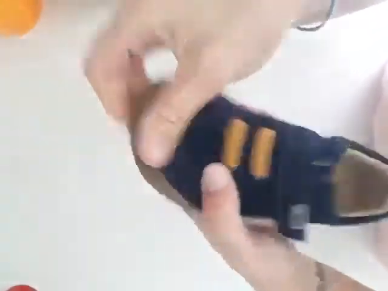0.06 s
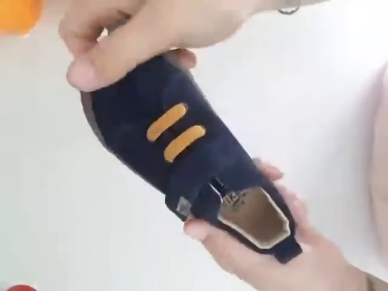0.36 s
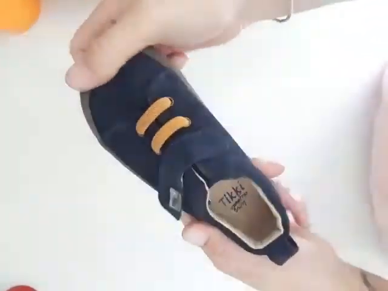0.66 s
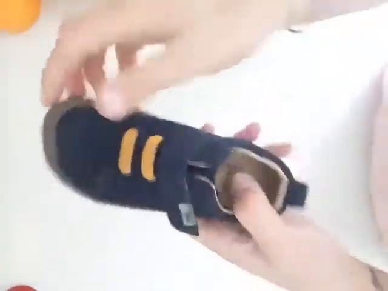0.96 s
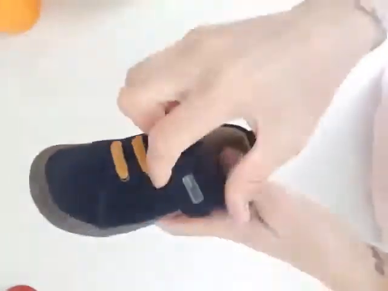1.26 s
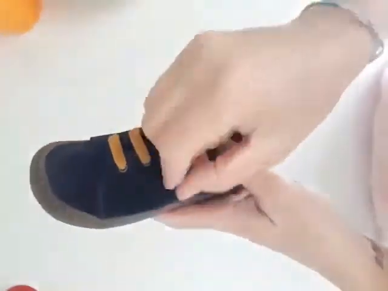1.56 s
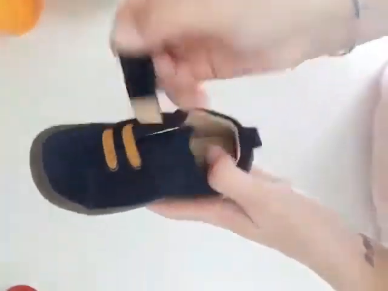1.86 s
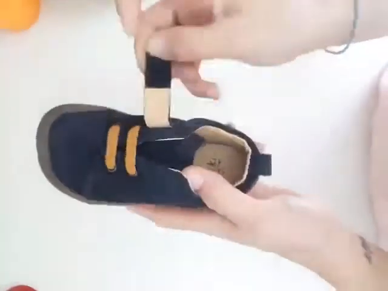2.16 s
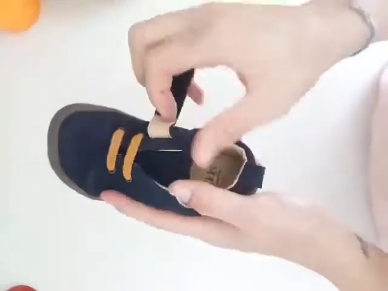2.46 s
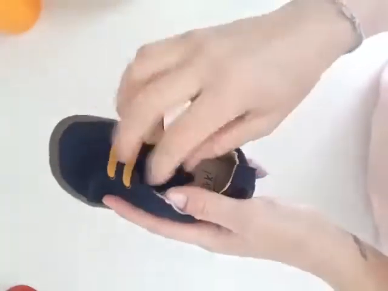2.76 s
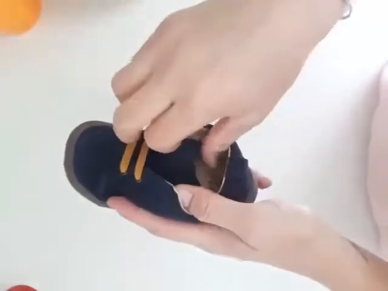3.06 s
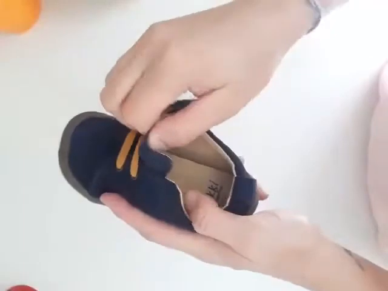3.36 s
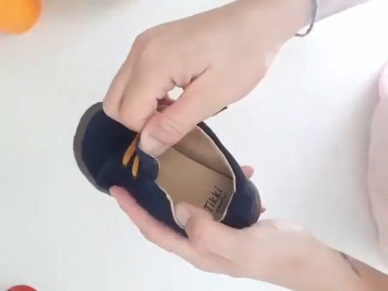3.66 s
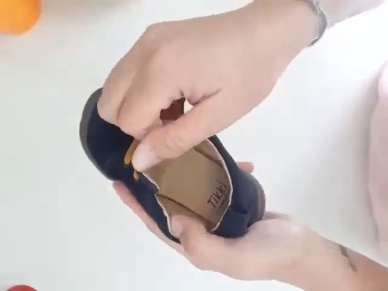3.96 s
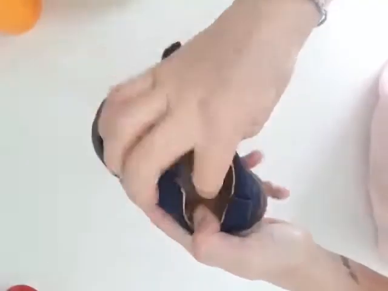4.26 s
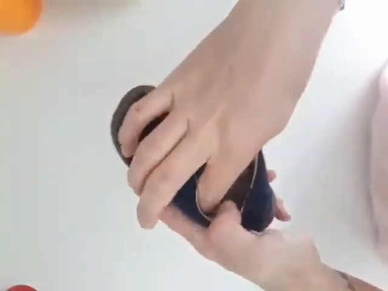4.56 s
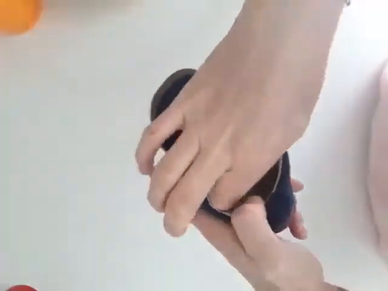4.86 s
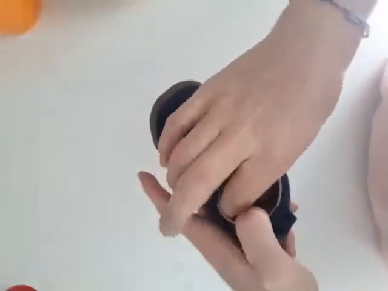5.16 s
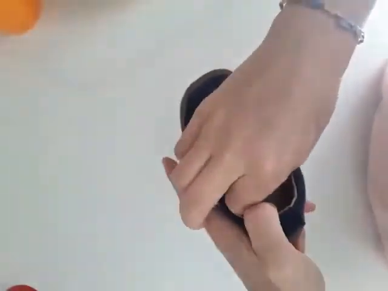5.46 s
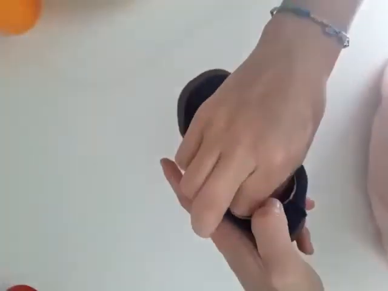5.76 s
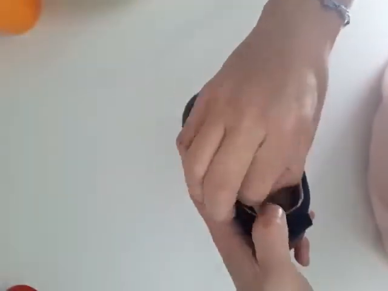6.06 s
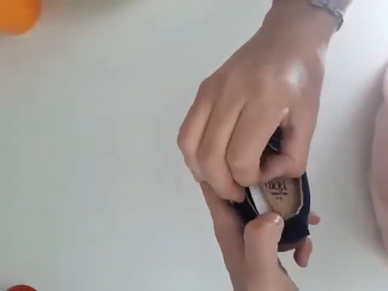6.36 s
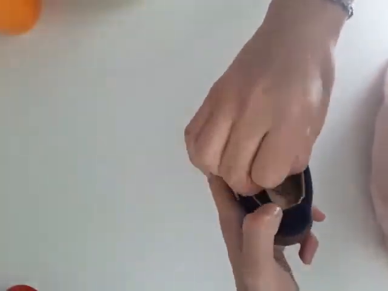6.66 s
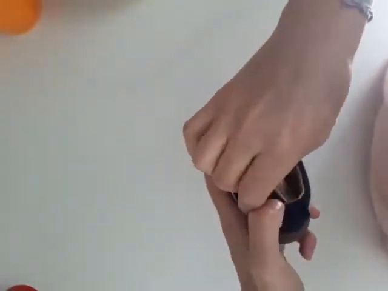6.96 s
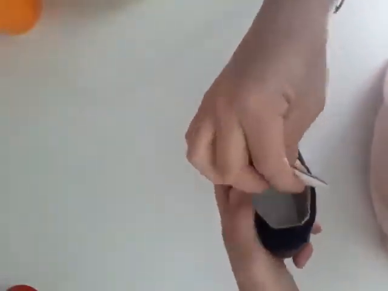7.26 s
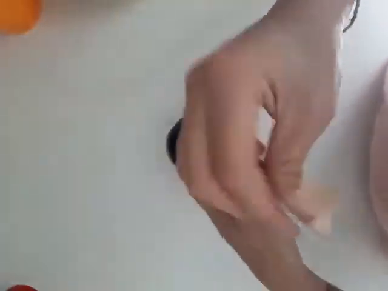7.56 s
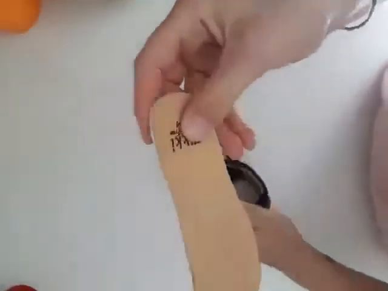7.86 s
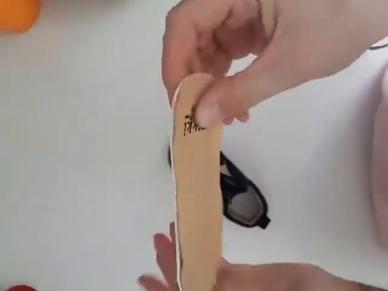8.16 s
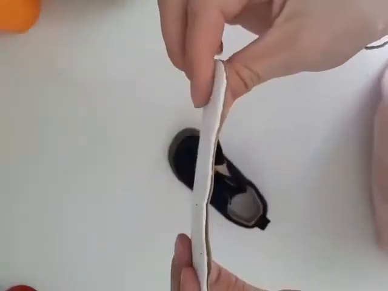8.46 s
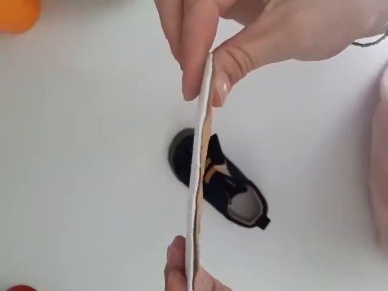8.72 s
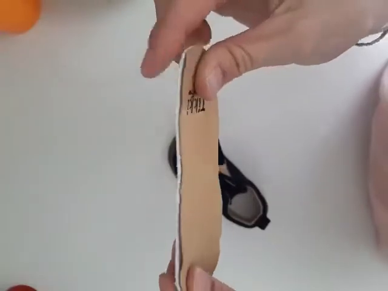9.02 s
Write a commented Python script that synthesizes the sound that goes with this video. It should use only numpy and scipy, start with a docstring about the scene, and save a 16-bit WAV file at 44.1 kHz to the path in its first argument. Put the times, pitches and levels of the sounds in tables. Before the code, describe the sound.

A soft shoe is handled close to the microphone in a small, quiet room with a faint electrical hum. For the first second and a half, fingers rub and flex it with faint rustles and small taps. From about 1.5 to 1.8 seconds its hook-and-loop strap rips open in quick, growing, crackly surges, loud against the rest. A click and a short scuff follow around 2.5 seconds. Soft rubbing continues, with light scrapes and ticks between 4 and 5 seconds. From about 5.8 to 6.6 seconds, fingers pick at the insole with sharper clicks and small hollow knocks. The insole drags with a rising rasp from 6.8 seconds and comes free with a snap at 7.3. The shoe bumps the table at 7.6 and flops down with a low, briefly ringing thump at 7.9. A scuff and a few faint rubs follow until about 9.3 seconds.

```python
"""A soft shoe is handled over a table in a small, quiet room with a faint mains hum.
First fingers fidget, rub and flex it: stick-slip friction and small impacts excite its cavity.
At 1.5 s the hook-and-loop strap rips open in surges. After more handling the insole is picked at,
drags, and slides out with a snap at 7.3 s. The shoe bumps the table and at 7.9 s flops down on it,
setting the top ringing; a few rubs follow. The left microphone faces the hands; the right is shaded."""
import sys
import numpy as np
from scipy import signal
from scipy.fft import rfft, irfft
from scipy.io import wavfile
from scipy.ndimage import uniform_filter1d

SR = 44100
rng = np.random.default_rng(int(sys.argv[2]) if len(sys.argv) > 2 else 0)


def wav_record(signal):
    """Record a signal, one row per channel, as 16-bit PCM in the file named by sys.argv[1]."""
    frames = np.transpose(np.atleast_2d(signal))
    bounded = np.clip(frames, -1, 1)
    # unit amplitude maps onto the largest positive 16-bit level
    quanta = np.round(bounded * 32767).astype(np.int16)
    wavfile.write(sys.argv[1], SR, quanta)


N = 409688

# Spectrum of the still room air. Each row: frequency in Hz, relative level in dB.
AIR_SPECTRUM = [(20, -28.5), (45, -21), (100, -5), (135, -7), (210, -12), (480, -25.5), (700, -24),
                (1100, -29.5), (2400, -30), (2900, -32.5), (3200, -22), (3600, -32.5), (6000, -34),
                (12800, -34)]
# Partials of the mains hum. Each row: frequency in Hz, relative level in dB.
HUM_PARTIALS = [(48.4, -78.5), (96.9, -73), (199.2, -74.5), (247.6, -80.5), (296.1, -89), (393.0, -89.5)]
# Spells of faint fidgeting. Each row: start in seconds, end in seconds.
FIDGET_SPELLS = [(0, 1.2), (2.0, 2.67), (3.65, 5.37), (6.0, 6.46)]
# Spectra of hollow scrape, cloth hiss and the snapping shoe. Each row: frequency in Hz, gain in dB.
SCRAPE_SPECTRUM = [(240, -44), (400, -12.5), (540, -9), (613, -5.5), (812, -4), (897, -3), (1140, -10.5),
                   (1280, -8), (1450, -7.5), (1740, -10.5), (1960, -12), (2370, -19), (3500, -9),
                   (4550, -48), (7700, -120)]
CLOTH_SPECTRUM = [(1200, -22), (2500, -3.5), (4500, 3), (7800, 6.5), (12500, -5.5)]
SHOE_SPECTRUM = [(60, -19), (130, -17.5), (400, -14.5), (650, -10), (950, -9.5), (1280, -9), (1900, -12),
                 (2400, -16.5), (3100, -13), (4000, -16), (5500, -12), (8000, -16.5), (10800, -22.5),
                 (13000, -34.5)]
# Resonances of the shoe's hollow. Each row: frequency in Hz, width in Hz, relative strength in dB.
HOLLOW_MODES = [(600, 110, 1.5), (834, 260, 8.5), (1306, 49, 9), (1580, 42, -2), (1940, 160, 2)]
# Cavity pitch, which drops while a hand covers the opening. Each row: time in seconds, pitch in Hz.
CAVITY_PITCH = [(0, 646), (.8, 814), (1.5, 729), (4.7, 726), (5.8, 680), (6.1, 640), (6.3, 545),
                (6.65, 644), (7.2, 760), (7.8, 770)]
# Snaps of sole, strap and insole edge. Each row: start in seconds, level in dB, tilt in dB per octave,
# crumple time in seconds, pitch of the flexed panel in Hz.
EDGE_SNAPS = [(.014, -47, -3, 0.0066, 1140), (.022, -50, -2, 0.0069, 600), (0.755, -53, -4.5, 0.0037, 1400),
              (.925, -65, -1.5, 0.0054, 1390), (1.1045, -51, -2, 0.0049, 1510), (1.487, -36, 0, 0.006, 680),
              (2.5073, -43, -0.5, 0.0016, 1490), (2.5095, -44, -1, 0.0012, 2730),
              (2.51, -47, -8.5, 0.0043, 286), (3.645, -66, 3, 0.0032, 1410),
              (4.323, -56.5, 1.5, 0.0056, 750), (4.692, -55.5, 7.5, 0.0032, 3860),
              (4.805, -52, 2.5, 0.0011, 4800), (4.809, -52, -1.5, 0.0032, 400),
              (4.8356, -52.5, 1.5, 0.0018, 4700), (4.853, -54.5, -3, 0.0044, 1000),
              (5.0225, -53, 5.5, 0.0018, 3600), (5.7743, -39, -0.5, 0.0014, 1400),
              (5.7865, -43.5, -1.5, 0.0034, 1650), (5.832, -47.5, 0.5, 0.0095, 1707),
              (5.8975, -44, -1.5, 0.0028, 1310), (5.947, -48.5, 2, 0.011, 1890),
              (5.994, -50, -1.5, 0.0063, 2010), (6.2893, -41.5, -1.5, 0.0021, 1154),
              (6.583, -49, 0.5, 0.015, 1590), (7.064, -50.5, -11, 0.0099, 684),
              (7.3424, -27.5, 2.5, 0.00027, 1910), (7.3448, -30, 1, 0.00057, 1360),
              (7.348, -37, -3, 0.00083, 2200), (7.3562, -38, -2, 0.00071, 1950)]
# Finger knocks on the hollow. Each row: start in seconds, level in dB, contact time in seconds.
FINGER_KNOCKS = [(.018, -49, 0.00075), (1.958, -65, 0.0012), (6.2895, -37, 0.0016), (6.582, -46.5, 0.0018)]
# Modes of the covered hollow. Each row: frequency in Hz, relative level in dB, 60 dB decay in seconds.
COVERED_MODES = [(391, -8.5, 0.1), (525, -6.5, 0.027), (586, 8.5, 0.036), (1310, 1, 0.025)]
# Quick fingertip strokes on suede and strap. Each row: peak time, rise and fade in seconds,
# level in dB, band centre in Hz, width in octaves.
FINGER_STROKES = [(.108, .008, .045, -75, 10500, 0.44), (.263, 0.0073, 0.04, -55.5, 7600, 0.68),
                  (0.447, 0.014, 0.049, -64.5, 387, 0.3), (0.774, 0.012, 0.042, -70, 1450, 0.12),
                  (1.107, 0.0099, 0.042, -61, 3400, 0.32), (1.125, 0.024, 0.039, -61, 2600, 0.11),
                  (1.96, 0.0083, 0.013, -57.5, 417, 0.49), (1.96, 0.0042, 0.0053, -42.5, 7130, 0.75),
                  (2.097, 0.0036, 0.0036, -46.5, 5150, 2.1), (2.572, .018, .02, -64, 10500, .3),
                  (4.2, 0.086, .25, -77, 1700, 1.2), (4.9, .08, .13, -74, 1080, 0.53),
                  (4.282, 0.012, 0.036, -64, 413, 0.38), (4.826, 0.033, 0.059, -56, 4600, 1.3),
                  (5.035, .016, 0.015, -58, 3350, 0.46), (5.999, 0.0082, 0.0097, -54.5, 1975, 0.091),
                  (6.965, 0.012, 0.033, -57, 3870, 1.06), (7.141, 0.022, 0.025, -52, 1110, 0.42),
                  (7.85, 0.02, .012, -56, 4220, .8), (8.262, .006, .008, -52.5, 7450, 0.66)]
# Rubs as the grip shifts. Each row: middle and length in seconds, scrape and hiss levels in dB.
GRIP_RUBS = [(0.146, 0.081, -72, -66.5), (0.242, 0.099, -62.5, -67.5), (0.387, 0.068, -82, -70),
             (0.507, 0.056, -70.5, -81), (0.611, 0.046, -93, -64), (0.667, 0.026, -69, -94),
             (1.436, 0.22, -82, -69), (1.869, .15, -62, -55), (2.134, 0.18, -69.5, -65.5),
             (2.282, 0.038, -97.5, -61.5), (2.563, 0.21, -81, -69), (3.093, 0.055, -74.5, -68.5),
             (3.292, 0.25, -80, -70), (3.755, 0.3, -73, -101), (4.03, 0.043, -62.5, -52),
             (4.29, 0.29, -85, -70.5), (4.535, 0.066, -69.5, -62.5), (4.832, 0.25, -71, -71),
             (5.028, 0.085, -69.5, -60.5), (5.18, 0.056, -69.5, -62.5), (5.961, 0.29, -71.5, -65),
             (6.124, 0.1, -62, -70.5), (6.29, 0.017, -49.5, -67), (6.579, 0.0088, -49, -69.5),
             (6.642, 0.24, -66, -68.5), (7.798, 0.47, -62, -65), (8.036, 0.085, -62.5, -61),
             (8.167, 0.039, -87, -57.5), (8.309, 0.073, -88, -60.5), (8.852, 0.44, -82.5, -80),
             (8.994, 0.083, -91.5, -65), (9.27, 0.044, -90, -63)]
# Short dry ticks of the handled shoe, including the bright edge of a snap and of the landing.
# Each row: start in seconds, level in dB, fade in seconds, band centre in Hz, width in octaves.
DRY_TICKS = [(0.49, -62, 0.002, 8500, 0.57), (0.5242, -63, 0.0016, 6500, 0.51),
             (1.03, -67, .005, 8750, 0.55), (2.5074, -51, 0.0037, 10400, 0.27),
             (2.6479, -43, .004, 9000, 2.9), (7.174, -53.5, .0014, 10430, 0.78),
             (7.8662, -49, 0.0072, 3200, .2), (7.977, -47, 0.0038, 8500, 0.77)]
# Surges and single pops of the tearing strap. Each row: start and length in seconds, level in dB,
# tilt in dB per octave, pitch of the plucked stretch in Hz, strength of that resonance in dB.
RIP_SURGES = [(1.475, 0.0011, -41, -1.5, 1300, -0.5), (1.482, 0.0018, -35, -2, 720, 3),
              (1.4873, .002, -27.5, 1, 680, 6.5), (1.497, 0.051, -42, -.5, 650, 1),
              (1.507, 0.00078, -31.5, -1, 1350, 3), (1.5186, .001, -34, -.5, 1900, 0),
              (1.5388, .003, -28, -1, 1950, 0.5), (1.5511, .0005, -25, -1, 760, 2.5),
              (1.554, .039, -32, 0, 1950, -2), (1.5603, .0008, -25.5, 2.5, 750, 2.5),
              (1.5718, .0005, -30.5, .5, 1950, 0.5), (1.6178, 0.0015, -21, 2, 690, 12.5),
              (1.622, .035, -24.5, -0.6, 1350, 0), (1.629, .001, -28, 1, 470, 3),
              (1.657, 0.061, -22.5, -0.1, 7100, -2), (1.6602, .001, -27.5, 0, 1400, 4.5),
              (1.6694, 0.0089, -22, -0.4, 1600, 2.5), (1.7066, .005, -25, 1, 1920, 5.5),
              (1.716, 0.004, -24, .5, 3000, 1), (1.7423, 0.001505, -17, 1, 1600, -4),
              (1.753, 0.0013, -22, .5, 720, 0), (1.769, 0.016, -20.5, 1, 10700, -4)]
# Spectrum of the releasing hooks. Each row: frequency in Hz, gain in dB.
HOOK_SPECTRUM = [(60, -45.5), (130, -26), (400, -17), (720, -4.5), (1040, -15.5), (1300, -13.5),
                 (1900, -10), (2350, -14), (3000, -10), (5000, -6), (6700, -6.5), (9000, -6), (13000, -6)]
# Resonances of the taut strap. Each row: frequency in Hz, width in Hz, relative strength in dB.
STRAP_MODES = [(419.4, 140, -4.5), (720, 300, -7), (1615, 82, -2.5), (1980, 180, 1.5), (2940, 270, -3),
               (3250, 160, -11), (4050, 110, -12), (6860, 600, -8.5), (7000, 740, -8)]
# The pulling hand screens the strap from the right microphone. Each row: frequency in Hz, gain in dB.
HAND_SCREEN = [(150, 2), (400, 6.5), (650, -6.5), (1000, -2), (1800, -2), (2400, -2.5), (4500, -2.5),
               (7000, 1.5), (11000, 2.5)]
# The strap's end and the insole scuff across skin. Each row: start, rise and fade in seconds,
# level in dB, comb spacing in Hz, tilt in dB per octave.
SKIN_SCUFFS = [(2.648, 0.011, 0.072, -47.5, 4630, -3), (7.956, 0.018, 0.073, -43.5, 3600, -5)]
# Drag of the insole, growing until its end leaves the shoe. Each row: time in seconds, level in dB.
INSOLE_DRAG = [(6.8, -74), (7.1, -66.5), (7.26, -59), (7.32, -47.5), (7.4, -53), (7.47, -49), (7.55, -71.5)]
# Resonances of opening shoe and bent insole. Each row: frequency in Hz, width in Hz, strength in dB.
INSOLE_MODES = [(740, 94, 11), (1240, 69, 8), (2093, 304, -6), (4350, 1000, -3.5)]
# Contacts of shoe and table. Each row: start in seconds, level in dB, low-pass cut-off in Hz.
SOLE_LANDINGS = [(7.6019, -39.5, 810), (7.637, -47.5, 700), (7.8664, -29, 3220), (7.87, -33, 2560),
                 (7.877, -37.5, 1190), (7.894, -36, 1800)]
# Spectrum of the sole's slap. Each row: frequency in Hz, gain in dB.
SLAP_SPECTRUM = [(30, -40), (65, -7), (130, 3), (270, -14), (490, -13.5), (660, -6.5), (800, -13),
                 (1250, -18), (2050, -22.5), (2500, -40.5), (3100, -23), (3700, -36), (6000, -20),
                 (12000, -15)]
# Modes of the table top. Each row: frequency in Hz, relative level in dB, 60 dB decay in seconds.
TABLE_MODES = [(62.9, -14, 0.61), (127.5, 3, 0.23), (138.5, -10, 0.071), (150, -4.5, 0.12), (261, -8, 0.19),
               (373, -3, 0.077), (663, -9, 0.088)]
# Dull pushes of the landing. Each row: middle in seconds, envelope peak in dB, frequency in Hz.
WEIGHT_THUMPS = [(7.609, -44, 106), (7.66, -46.5, 70), (7.8485, -43, 95), (7.8754, -25.5, 122),
                 (7.925, -47, 75)]
# Reverberation of the room. Each row: frequency in Hz, 60 dB decay in seconds.
ROOM_DECAY = [(100, 0.87), (300, 0.59), (800, 0.35), (2000, 0.35), (5000, 0.26), (12000, 0.14)]
# Likeness of diffuse sound at the two microphones. Each row: frequency in Hz, coherence from 0 to 1.
COHERENCE = [(150, 0.76), (400, 0.47), (900, 0.067), (2000, 0.0085)]
# Response of each microphone. Each row: frequency in Hz, gain in dB.
LEFT_RESPONSE = [(120, 2), (300, 3.5), (450, 6), (680, 1), (1300, 2.5), (2500, 4.5), (5000, 2.5),
                 (8000, 1.5), (12500, 2.5)]
RIGHT_RESPONSE = [(120, 0), (300, -0.5), (440, -9), (660, 4), (1000, 0.5), (2000, 5.5), (4500, 4.5),
                  (7500, -11), (10000, -9), (12800, -16)]

BINS = np.fft.rfftfreq(4096, 1 / SR)  # frequency grid of the filters in Hz
OCTAVES = np.log2(np.maximum(BINS, 200) / 1000)  # distance from 1 kHz
IMPACT_SAMPLES = SR // 100  # an impact at 0 dB has the energy of 10 ms at rms 1


def amp(db):
    """Amplitude ratio of a level in decibels."""
    return 10 ** (np.asarray(db) / 20)


def unit(x):
    """Normalisation to rms 1."""
    return x / np.sqrt(np.mean(x ** 2) + 1e-20)


def curve(points, hz=BINS):
    """Interpolation of a table on a logarithmic frequency axis."""
    frequency, value = np.transpose(points)
    return np.interp(np.log(hz + 1), np.log(frequency + 1), value)


def add(mix, start_s, sound):
    """Superposition: a sound joins the mix at its start time."""
    part = mix[max(round(start_s * SR), 0):][:len(sound)]
    part += sound[:len(part)]


def minimum_phase(db):
    """The minimum-phase impulse response: the quickest to die for this gain over BINS."""
    log_gain = np.log(amp(np.maximum(np.r_[db, db[-2:0:-1]], db.max() - 100)))
    return np.fft.ifft(np.exp(np.conj(signal.hilbert(log_gain)))).real


def filtered(x, points):
    """Linear filtering by a gain curve of (Hz, dB) points."""
    return signal.oaconvolve(x, minimum_phase(curve(points)))[:N]


def ring(x, db):
    """Source and filter: x drives a body with this spectrum and a response of unit energy."""
    response = minimum_phase(db)
    return signal.fftconvolve(x, response / np.linalg.norm(response))


def resonances(modes, height=1):
    """Gain in dB of Lorentzian peaks standing above a flat response."""
    peaks = sum(amp(db) / (1 + (2 * (BINS - hz) / width) ** 2) for hz, width, db in modes)
    return 20 * np.log10(1 + height * peaks)


def free_vibration(modes, t):
    """A struck body vibrates as a sum of exponentially damped sinusoids."""
    return sum(amp(db - 60 * t / t60) * np.sin(2 * np.pi * hz * t) for hz, db, t60 in modes)


def whitened(x, smooth_bins=24):
    """Inverse filtering evens out the broad colour of a response and keeps its fine ripple."""
    size = len(x) + 4096
    power = uniform_filter1d(abs(rfft(x, size)) ** 2, smooth_bins * size // 4096)
    power = np.interp(BINS, np.linspace(0, SR / 2, len(power)), power)
    return signal.fftconvolve(x, minimum_phase(-10 * np.log10(power + 1e-9)))[:len(x)]


def wobble(samples):
    """Low-pass noise of rms 1 that changes over about this many samples."""
    return unit(uniform_filter1d(uniform_filter1d(rng.standard_normal(N), samples), samples // 2))


def slips(size, per_s, spread_db, wash=0.1):
    """Stick-slip as a Poisson process: tiny releases, a few large, over a wash of the finest."""
    released = rng.random(size) < per_s / SR
    sign = rng.choice([-1, 1], size)
    strength = amp(spread_db * np.minimum(rng.exponential(1, size), 4))
    return unit(sign * strength * (released + wash))


def impact(crumple_s, crumple, size=2048):
    """Broadband excitation: one impulse, then a swelling and dying crumple of small slips."""
    age = np.arange(size) / SR / crumple_s
    force = slips(size, per_s=9000, spread_db=1.43) * (1 - np.exp(-age / 0.27)) * np.exp(-age)
    force *= crumple / np.linalg.norm(force)
    force[0] = 1
    return whitened(force) * np.sqrt(IMPACT_SAMPLES)


def friction_band(hz, octaves, hollow):
    """Band-pass spectrum in dB of slipping fibres, tinted by the resonances of the hollow."""
    off_centre = np.log2((BINS + 1) / hz) / octaves
    return -22 * np.log10(1 + 0.56 * off_centre ** 2) + resonances(HOLLOW_MODES, height=hollow)


def diffuse_pair(spectra, hz):
    """Spatial coherence: a diffuse field is alike at two close microphones only in the bass."""
    alike = curve(COHERENCE, hz)
    return np.array([spectra[0], alike * spectra[0] + np.sqrt(1 - alike ** 2) * spectra[1]])


def air_and_hum(air_db=-69.5, hum_gain_db=1.52, drift_radians=0.34):
    """Diffuse noise of room air, and a mains hum that wavers by slow phase modulation."""
    hz, t = np.fft.rfftfreq(N, 1 / SR), np.arange(N) / SR
    noise = diffuse_pair(rfft(rng.standard_normal((2, N))), hz)
    air = unit(irfft(noise * amp(curve(AIR_SPECTRUM, hz)), N))
    hum, knots = np.zeros(N), np.linspace(0, t[-1], num=40)
    for partial_hz, db in HUM_PARTIALS:
        drift = drift_radians * np.interp(t, knots, rng.standard_normal(len(knots)))
        hum += amp(db) * np.sqrt(2) * np.sin(2 * np.pi * partial_hz * t + drift)
    return amp(air_db) * air + amp(hum_gain_db) * hum


def fidget_and_drag(swing_db=2.5, spurt_db=3):
    """Sliding friction: fingers, and later the insole, scrape and hiss; the insole rasps in spurts."""
    t = np.arange(N) / SR
    touching = sum((t >= start) & (t <= end) for start, end in FIDGET_SPELLS)
    fidget = uniform_filter1d(touching.astype(float), size=3000) * amp(swing_db * wobble(3000))
    drag = amp(np.interp(t, *np.transpose(INSOLE_DRAG), left=-np.inf, right=-np.inf))
    scrape_level = amp(-81) * fidget + amp(-1.5) * drag
    hiss_level = amp(-79.5) * fidget + amp(-5) * drag
    coarse = slips(N, per_s=1000, spread_db=0.5) * scrape_level * amp(1.4 * wobble(1200))
    fine = slips(N, per_s=860, spread_db=1.5) * hiss_level * amp(0.99 * wobble(900))
    spurts = slips(N, per_s=1000, spread_db=1.5) * drag * amp(spurt_db * wobble(300))
    scrape = ring(coarse, curve(SCRAPE_SPECTRUM) + resonances(HOLLOW_MODES))
    hiss = ring(fine, curve(CLOTH_SPECTRUM))
    rasp = ring(spurts, friction_band(hz=2320, octaves=2.04, hollow=0.1045) + resonances(INSOLE_MODES))
    return (scrape + hiss + rasp)[:N]


def cavity_mode(time_s, width_hz, db):
    """Cavity resonance of the shoe at its pitch of the moment."""
    return np.interp(time_s, *np.transpose(CAVITY_PITCH)), width_hz, db


def snaps(panel_width_share=0.28, panel_db=7.5):
    """Impulse excitation: an edge flips free and rings a flexed panel and the shoe's cavity."""
    out = np.zeros(N)
    for start, db, tilt, crumple_s, panel_hz in EDGE_SNAPS:
        cavity = cavity_mode(start, width_hz=110, db=9.5)
        panel = (panel_hz, panel_width_share * panel_hz, panel_db)
        body = curve(SHOE_SPECTRUM) + resonances([cavity, panel]) + tilt * OCTAVES
        add(out, start, amp(db) * ring(impact(crumple_s, crumple=crumple_s / 0.0007), body))
    return out


def knocks():
    """Damped vibration: a soft fingertip sets the hand-covered hollow ringing for a moment."""
    out, t = np.zeros(N), np.arange(SR // 6) / SR
    for start, db, contact_s in FINGER_KNOCKS:
        tap = (1 - np.exp(-t / contact_s)) * free_vibration(COVERED_MODES, t)
        add(out, start, amp(db) * tap * np.sqrt(IMPACT_SAMPLES) / np.linalg.norm(tap))
    return out


def strokes():
    """Stick-slip of fibres under a fingertip: a swell of fine grains in one band."""
    out, t = np.zeros(N), np.arange(-SR // 5, SR // 2) / SR
    for peak_s, rise, fade, db, hz, octaves in FINGER_STROKES:
        swell = np.exp(-(np.minimum(t, 0) / rise) ** 2 - np.maximum(t, 0) / fade)
        grains = swell * slips(len(t), per_s=5800, spread_db=4.0)
        add(out, peak_s + t[0], amp(db) * ring(grains, friction_band(hz, octaves, hollow=0.23)))
    return out


def rubs(neutral_length_s=0.28):
    """Friction of skin on the shoe: coarse slips sound the hollow, fine ones hiss on the cloth."""
    out, t = np.zeros(N), np.arange(-SR // 4, SR // 4) / SR
    hollow, cloth = curve(SCRAPE_SPECTRUM) + resonances(HOLLOW_MODES), curve(CLOTH_SPECTRUM)
    for middle, length, scrape_db, hiss_db in GRIP_RUBS:
        swell = np.exp(-(2 * t / length) ** 2)
        tilt = 1.5 * np.log2(neutral_length_s / length)  # a quicker rub hisses brighter
        cavity = resonances([cavity_mode(middle, width_hz=70, db=0.5)], height=0.9)
        scrape = ring(swell * slips(len(t), per_s=1700, spread_db=2.5), hollow + cavity)
        hiss = ring(swell * slips(len(t), per_s=4600, spread_db=4.0), cloth + tilt * OCTAVES)
        rub = amp(scrape_db) * scrape + amp(hiss_db) * hiss
        add(out, middle + t[0], rub[np.sum(middle + t < 0):])
    return out


def ticks():
    """Band-limited transients: the handled shoe ticks with a few milliseconds of bright crackle."""
    out = np.zeros(N)
    for start, db, fade_s, hz, octaves in DRY_TICKS:
        add(out, start, amp(db) * ring(impact(fade_s, crumple=3.5), friction_band(hz, octaves, hollow=0)))
    return out


def peel_envelope(t, length, rise_s=0.00039, jerk_s=0.0023, sag_db_per_s=53.5, stall_s=0.0042):
    """Peeling: a row of hooks gives way with a jerk, the surge sags, and it dies as the peel stalls."""
    attack = (1 - np.exp(-t / rise_s)) * (1 + 0.6 * np.exp(-t / jerk_s))
    return attack * amp(-sag_db_per_s * t) * np.exp(-np.maximum(t - length, 0) / stall_s)


def strap_rip(groups=3, crack=5.2, colour_db=3.5, pluck_width_share=0.24):
    """Plucking: hooks leave their loops in surges, each exciting another stretch of the taut strap."""
    wander_octaves, fall_octaves_per_s, taut_s = 0.025, 0.12, 1.68
    out, t = np.zeros(N), np.arange(SR // 8) / SR
    hooks = slips(N, per_s=170, spread_db=3.2, wash=0.03) * amp(2.4 * wobble(70))
    knots = np.linspace(OCTAVES[0], OCTAVES[-1], num=30)
    for start, length, db, tilt, pluck_hz, pluck_db in RIP_SURGES:
        peel = peel_envelope(t, length)
        pluck = resonances([(pluck_hz, pluck_width_share * pluck_hz, pluck_db)])
        body = curve(HOOK_SPECTRUM) + tilt * OCTAVES + pluck
        for group in range(groups):
            # Tension differs between groups of hooks; the resonances fall as the freed part grows.
            pitch = 2 ** (wander_octaves * rng.standard_normal() - fall_octaves_per_s * (start - taut_s))
            colour = resonances([(hz * pitch, width, gain) for hz, width, gain in STRAP_MODES], height=2)
            colour += colour_db * np.interp(OCTAVES, knots, rng.standard_normal(len(knots)))
            crackle = hooks[rng.integers(N - len(t)):][:len(t)]
            surge = unit(crackle * peel) * np.sqrt(np.mean(peel ** 2) / groups)
            surge[0] += crack * (group == 0)  # one click opens each surge
            add(out, start, amp(db) * ring(surge, body + colour))
    return out


def scuffs(reflection=0.52, low_cut_hz=1900, clump_db=2.5):
    """Comb filtering: an edge skids over skin in clumped grains, made reedy by a close reflection."""
    out, t = np.zeros(N), np.arange(SR // 2) / SR
    grains = slips(N, per_s=1800, spread_db=2.5, wash=0.07) * amp(clump_db * wobble(150))
    low_cut = -10 * np.log10(1 + (low_cut_hz / (BINS + 1)) ** 4)
    for start, rise, fade, db, spacing_hz, tilt in SKIN_SCUFFS:
        swell = (1 - np.exp(-(t / rise) ** 2)) * np.exp(-t / fade)
        comb = 20 * np.log10(abs(1 + reflection * np.exp(-2j * np.pi * BINS / spacing_hz)))
        skid = swell * grains[rng.integers(N - len(t)):][:len(t)]
        add(out, start, amp(db) * ring(skid, low_cut + comb + tilt * OCTAVES))
    return out


def landings(low_cut_hz=48):
    """Impact on a plate: the rubber sole slaps the table, which rings low; softer contact is duller."""
    out, t = np.zeros(N), np.arange(SR // 2) / SR
    for start, db, cutoff_hz in SOLE_LANDINGS:
        dull = -10 * np.log10(1 + (BINS / cutoff_hz) ** 8)
        slap = ring(impact(crumple_s=0.002, crumple=0.88), curve(SLAP_SPECTRUM) + dull)
        modes = [(hz, mode_db + np.interp(hz, BINS, dull), t60) for hz, mode_db, t60 in TABLE_MODES]
        top = free_vibration(modes, t)
        add(out, start, amp(db) * slap)
        add(out, start, amp(db - 1.5) * top * np.sqrt(IMPACT_SAMPLES) / np.linalg.norm(top))
    return signal.sosfilt(signal.butter(4, low_cut_hz, "high", fs=SR, output="sos"), out)


def thumps(half_length_cycles=0.9):
    """Pressure pulses: the shoe's weight and the air under it give one deep swing per push."""
    out, t = np.zeros(N), np.arange(-SR // 25, SR // 25) / SR
    for middle, db, hz in WEIGHT_THUMPS:
        envelope = np.exp(-(hz * t / half_length_cycles) ** 2)
        add(out, middle + t[0], amp(db) * np.sin(2 * np.pi * hz * t) * envelope)
    return out


def diffuse_tails(decay, onset_s):
    """Reverberation: two noise tails of unit energy, each band decaying at its own rate."""
    hz, t, spectra = signal.stft(rng.choice([-1., 1.], (2, SR // 2)), SR, nperseg=256)
    spectra = diffuse_pair(spectra.transpose(0, 2, 1), hz) * amp(-60 * t[:, None] / curve(decay, hz))
    tails = signal.istft(spectra.transpose(0, 2, 1), SR, nperseg=256)[1]
    tails *= 1 - np.exp(-(np.arange(tails.shape[1]) / SR / onset_s) ** 2)
    return tails / np.linalg.norm(tails, axis=1, keepdims=True)


def reflections(near_db, far_db):
    """Early reflections off table and wall, then the room's reverberant tail, both thin in the bass."""
    near = diffuse_tails([(200, 0.1), (8000, 0.059)], onset_s=0.00033)
    far = diffuse_tails(ROOM_DECAY, onset_s=0.0091)
    paths = near * amp([[near_db], [near_db + 1.5]]) + far * amp([[far_db], [far_db + 2.5]])
    thin_bass = minimum_phase(curve([(120, -5.5), (450, 0.5)]))
    return np.array([signal.fftconvolve(whitened(p) * np.linalg.norm(p), thin_bass) for p in paths])


def room(x, near_db, far_db, right_db, shifts_per_s=1.3, lag_samples=20, patterns=3):
    """Multipath propagation: direct sound plus reflections that shift as the hands move."""
    turn = 2 * np.pi * shifts_per_s * np.arange(N) / SR
    pair = np.zeros((2, N))
    for k in range(patterns):
        share = x * np.cos(turn + np.pi * k / patterns) * np.sqrt(2 / patterns)
        pair += signal.oaconvolve(share[None], reflections(near_db, far_db), axes=1)[:, :N]
    facing = filtered(x, [(150, 0.1), (700, -2.0), (6000, -1.2)])
    shaded = filtered(x, [(150, -7.0), (700, -1.0), (3000, -18.0)])  # little direct treble
    add(pair[0], 0, facing)
    add(pair[1], lag_samples / SR, shaded)
    return pair * amp([[0], [right_db]])


def scene():
    """Superposition at two microphones: each action has its own distance and side."""
    landing = landings()
    pair = room(strap_rip(), near_db=-4, far_db=-16, right_db=1, shifts_per_s=1.511)
    pair[1] = filtered(pair[1], HAND_SCREEN)
    pair += room(snaps(), near_db=-5, far_db=-11.5, right_db=0)
    pair += room(ticks(), near_db=-11, far_db=-13.5, right_db=4.5)
    pair += room(scuffs(), near_db=-7, far_db=-13.5, right_db=5)
    pair += room(knocks(), near_db=-22, far_db=-15.5, right_db=0)
    pair += room(strokes() + rubs() + fidget_and_drag(), near_db=-3, far_db=-13.5, right_db=-0.5)
    pair += room(landing, near_db=-2, far_db=-10.5, right_db=3.5, shifts_per_s=0.6)
    pair += thumps()  # these reach both microphones alike
    return np.array([filtered(pair[0], LEFT_RESPONSE), filtered(pair[1], RIGHT_RESPONSE)]) + air_and_hum()


def record(dry):
    """Soft saturation rounds off the highest peaks; a low-pass filter then limits the band."""
    ceiling, edge_hz = 0.38, 13250
    rounded = dry / (1 + (dry / ceiling) ** 4) ** (1 / 4)
    low_pass = signal.firwin(401, edge_hz, window=("kaiser", 8), fs=SR)
    return signal.oaconvolve(rounded, low_pass[None], "same")


dry = scene()
out = record(dry)
wav_record(out)
```